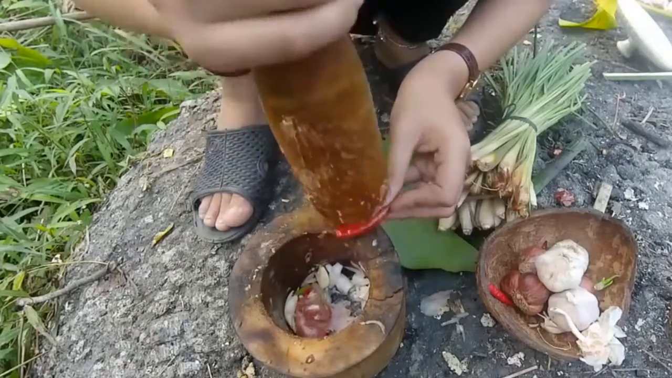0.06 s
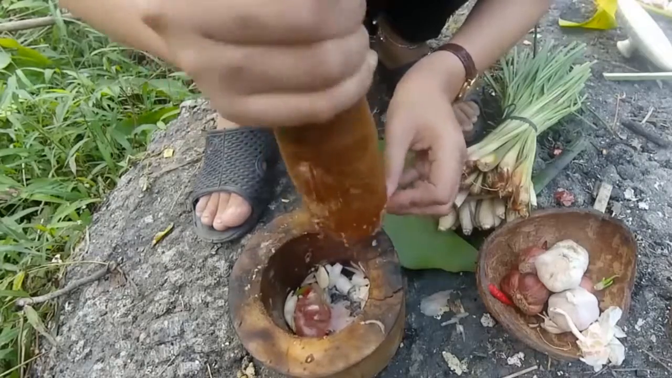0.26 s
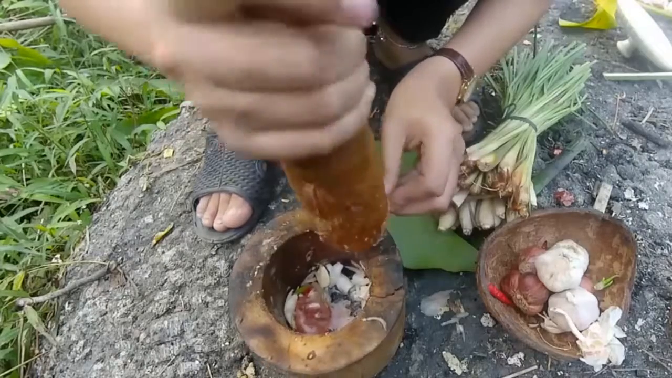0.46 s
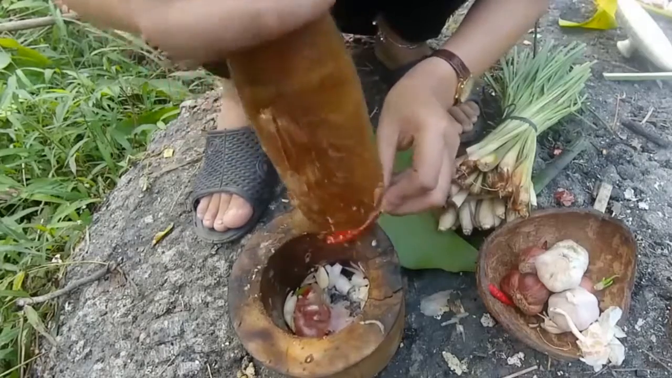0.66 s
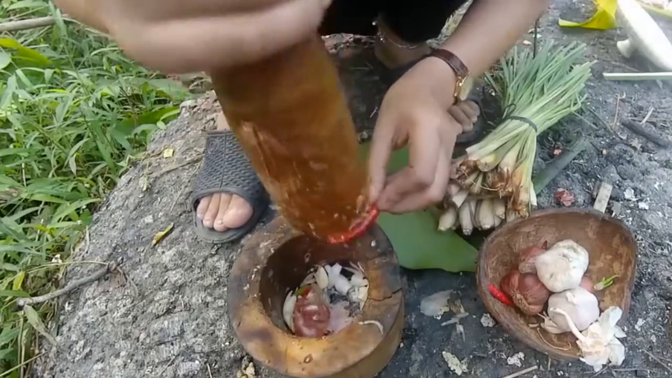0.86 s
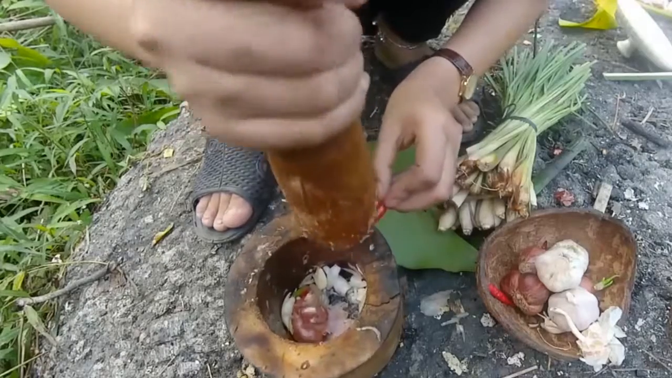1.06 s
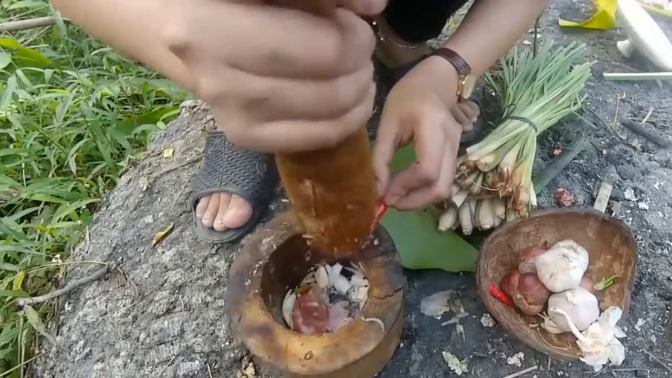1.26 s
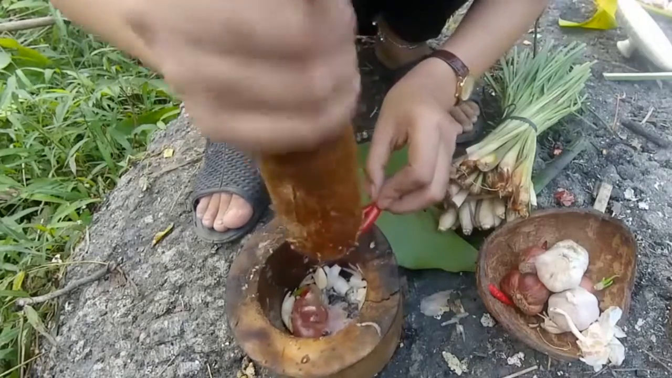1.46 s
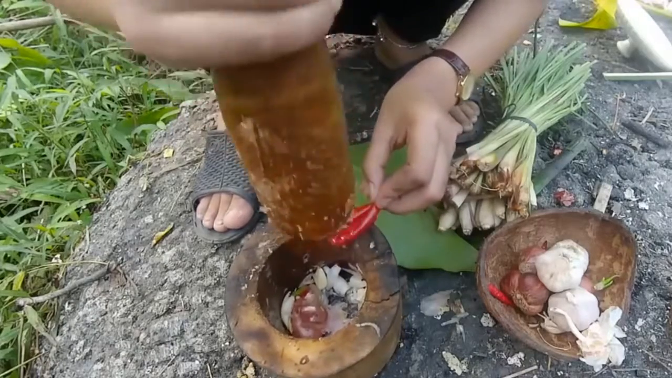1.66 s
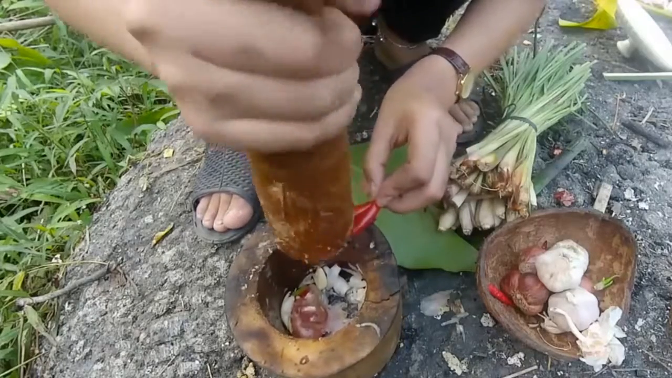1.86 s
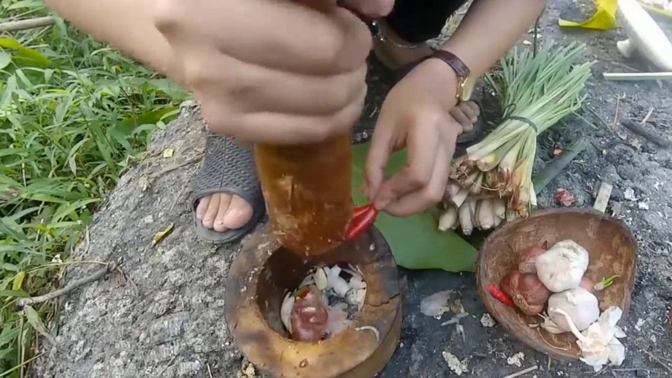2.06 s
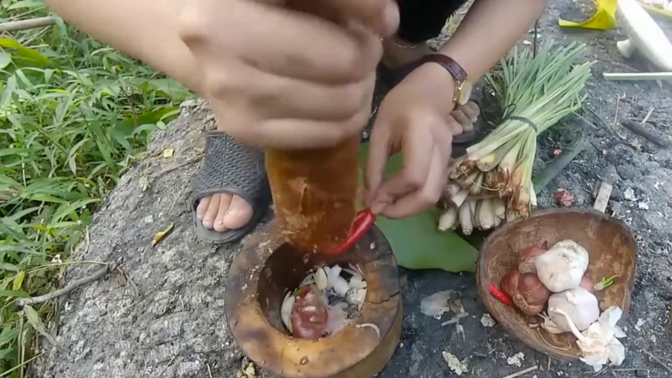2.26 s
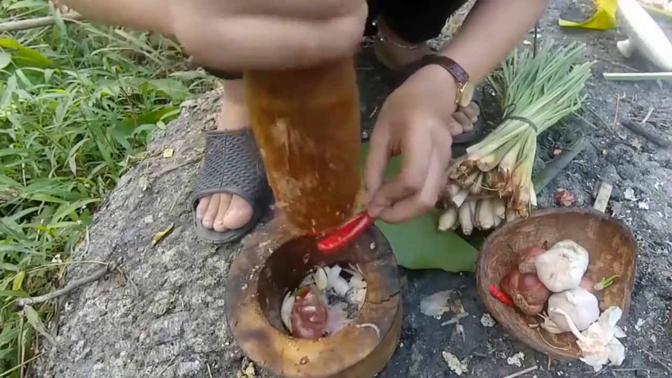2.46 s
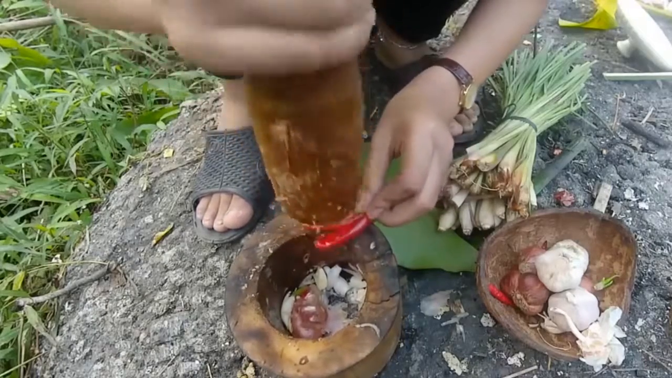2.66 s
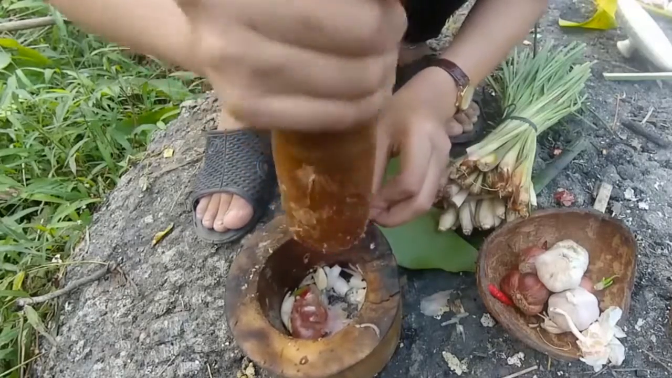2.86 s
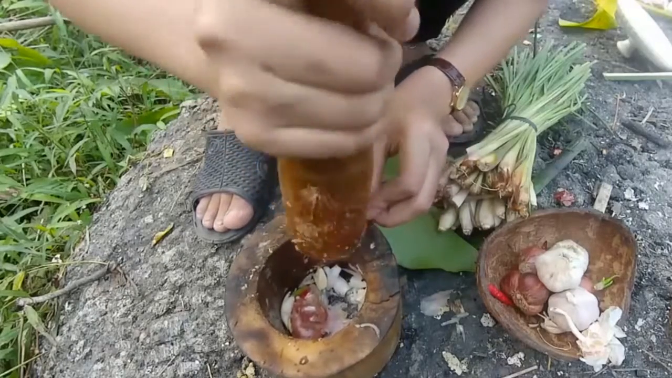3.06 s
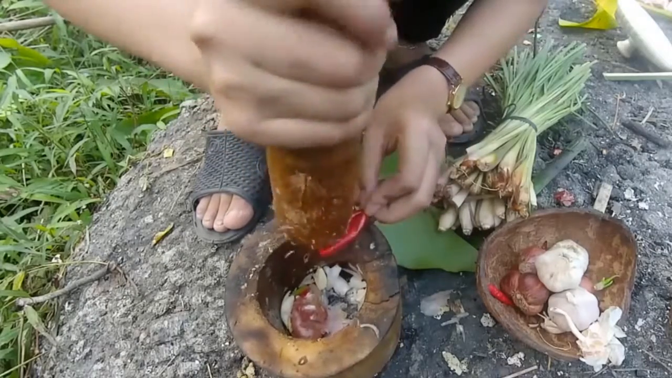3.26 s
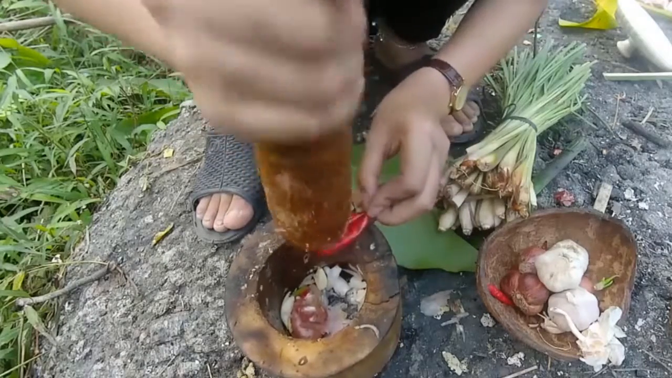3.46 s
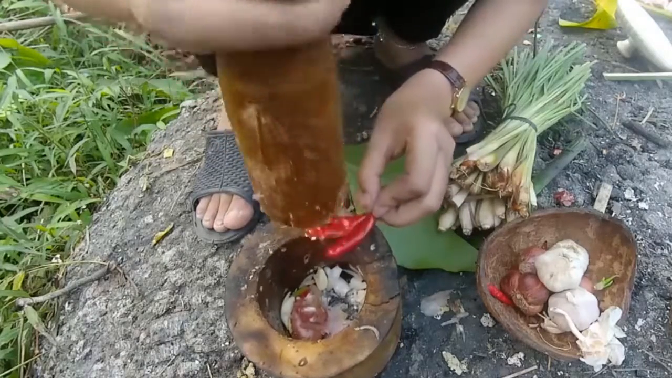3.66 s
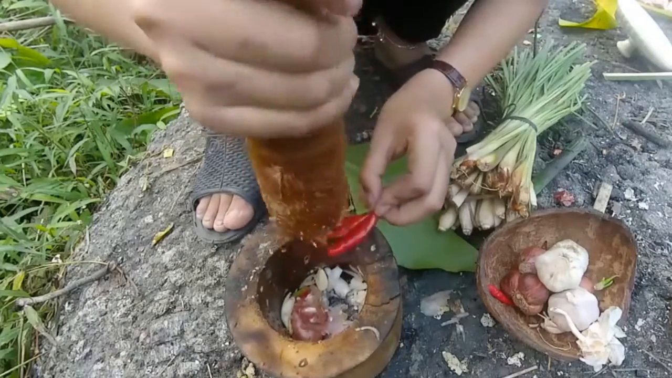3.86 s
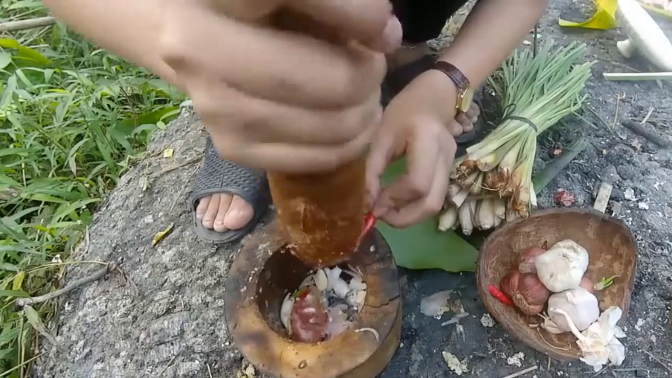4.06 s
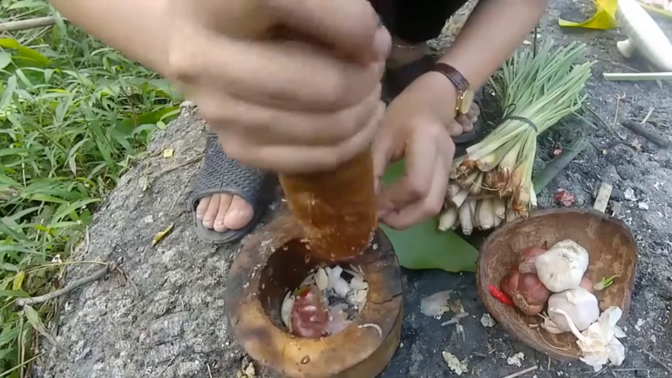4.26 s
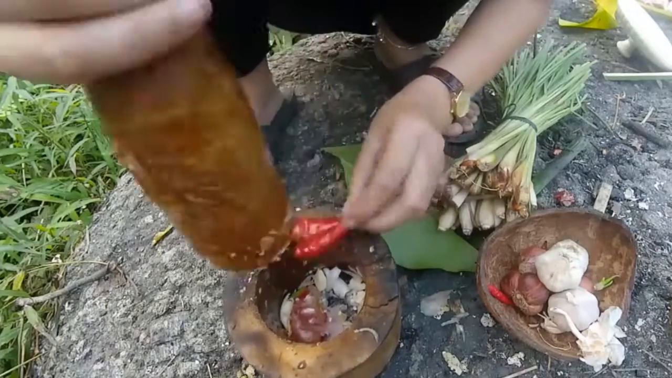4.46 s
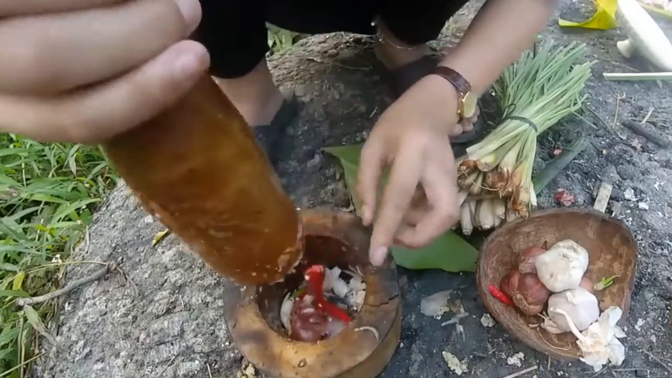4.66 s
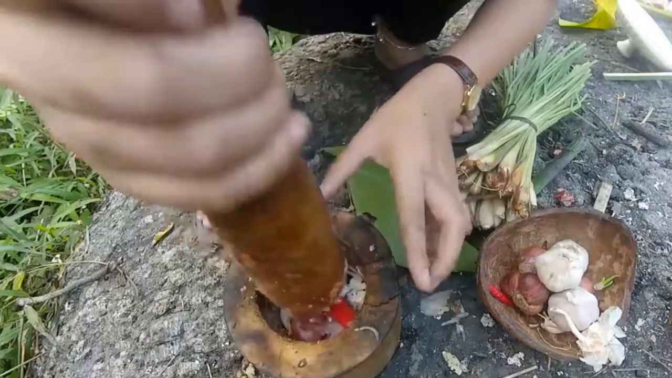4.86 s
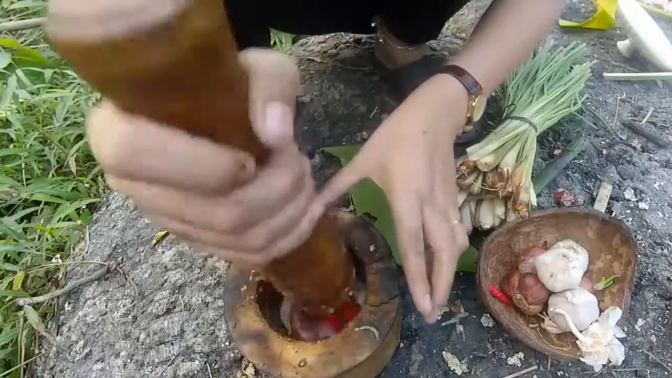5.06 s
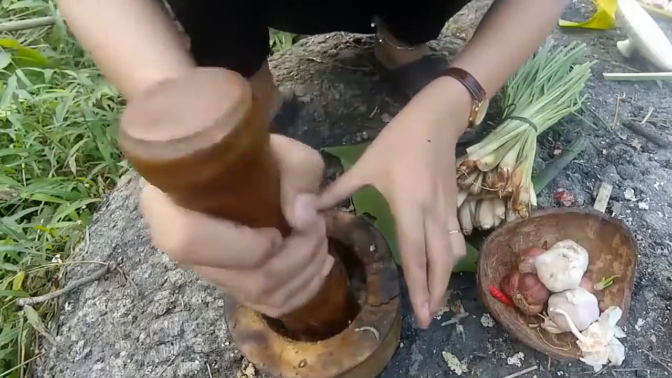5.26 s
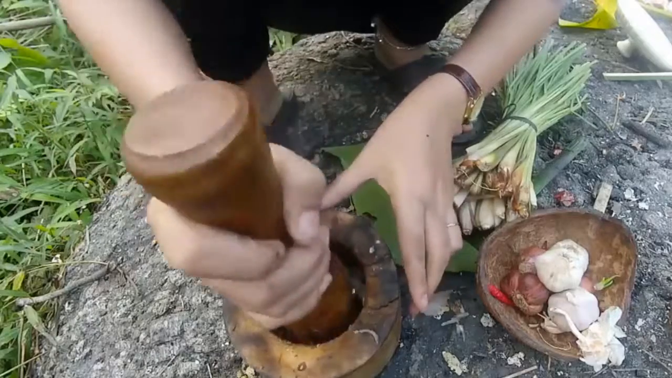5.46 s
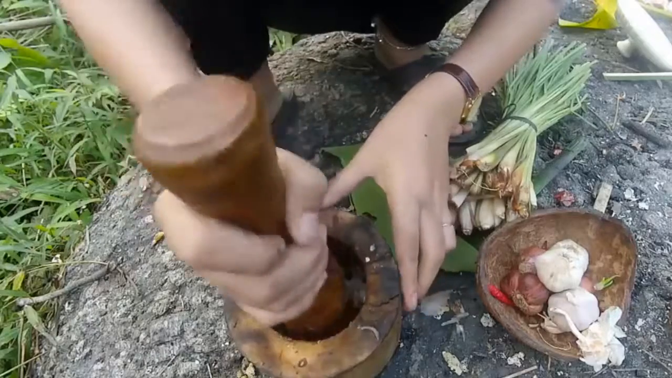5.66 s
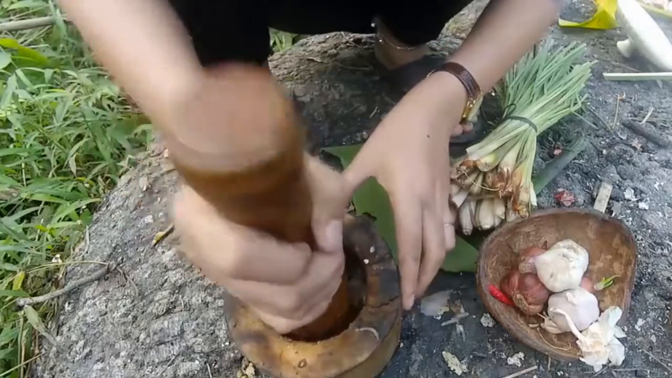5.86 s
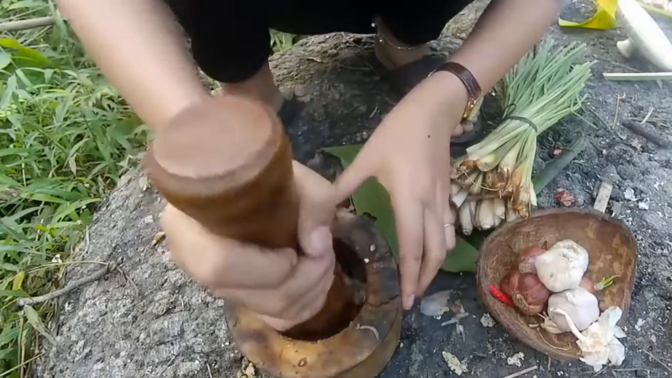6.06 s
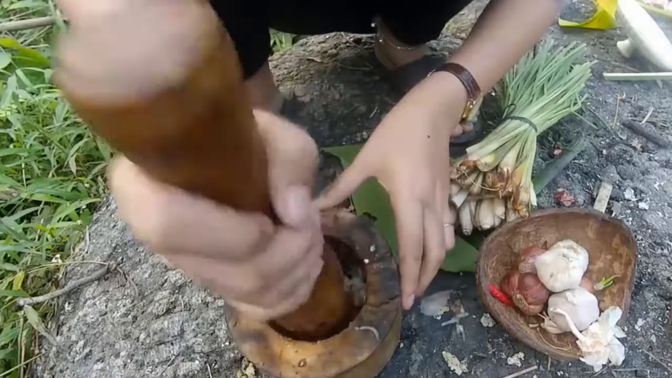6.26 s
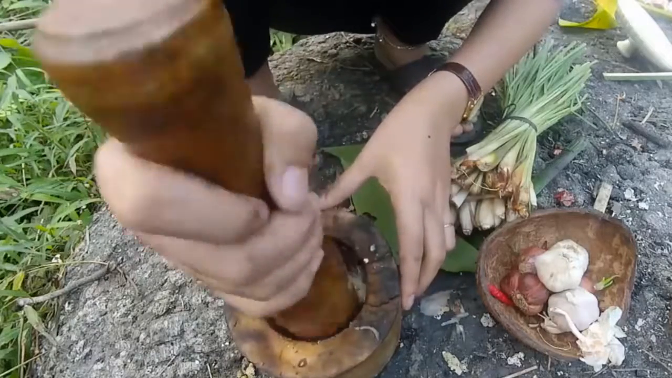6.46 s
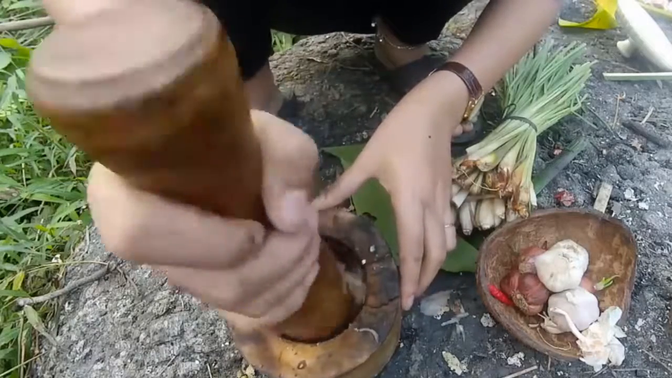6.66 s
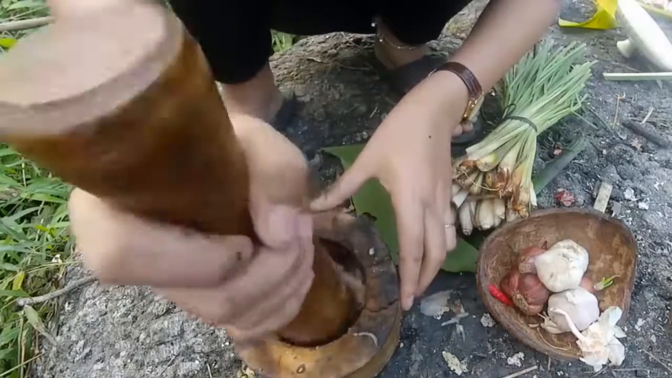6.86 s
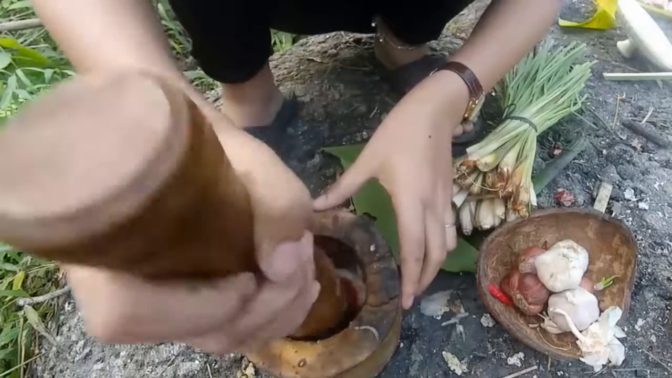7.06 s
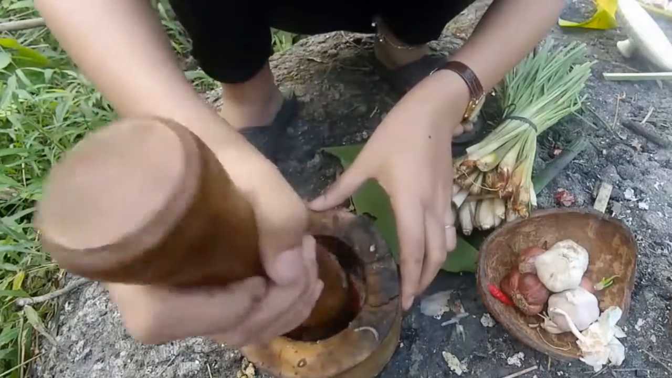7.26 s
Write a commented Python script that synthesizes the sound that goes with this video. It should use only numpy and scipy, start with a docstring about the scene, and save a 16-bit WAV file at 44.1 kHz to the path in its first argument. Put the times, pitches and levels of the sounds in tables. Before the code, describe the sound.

Outdoors and very close to the microphone, a heavy wooden pestle strikes food in a hollow wooden mortar about four times a second. Blows begin duller and softer, grow loud and woody, then briefly stop. Pounding returns harder, with crisp wet crunches, rim knocks and quick double taps. The loudest hits slightly overload. A faint low rumble, insect bands and airy hiss stay steady behind.

```python
"""On stony ground outdoors, a wooden pestle pounds wet food in a hollow wooden mortar, close to a microphone.
Each blow pushes air out, rings the hollow and the wood as decaying modes, booms in the ground,
rattles on grit and crushes the food with a short squelch of crackling noise; rim knocks and rebounds join in.
Behind lie a low rumble, insect-like bands and a hiss, made from random short-time spectra.
The hardest blows overload the input."""
import sys
import numpy as np
from scipy import signal
from scipy.fft import rfft, irfft
from scipy.io import wavfile
from scipy.ndimage import uniform_filter1d

SR = 44100
rng = np.random.default_rng(int(sys.argv[2]) if len(sys.argv) > 2 else 0)


def transcribe(u):
    """Save the signal u as a 16-bit wav file named by the first command-line argument.

    u: samples, shape (n,) or (channels, n), limited to [-1, 1]; the rate is SR.
    q: integer samples, one column per channel.
    """
    v = np.clip(np.atleast_2d(u).T, -1, 1)
    q = np.round(v * 32767).astype(np.int16)
    wavfile.write(sys.argv[1], SR, q)


N = 322371


def gain_of(db):
    """Decibels to amplitude."""
    return 10 ** (np.asarray(db) / 20)


def evened(x):
    """Scales to rms 1."""
    return x / np.sqrt(np.mean(x ** 2) + 1e-20)


def read(points, hz):
    """Reads a spectrum table in dB on a log-frequency axis."""
    f, db = np.transpose(sorted(points))
    return np.interp(np.log(hz + 1), np.log(f + 1), db)


def coloured(noise, db):
    """Noise filtered by a spectrum in dB, then set to rms 1."""
    return evened(irfft(rfft(noise) * gain_of(db), len(noise)))


def add(mix, s, sound):
    """Mixes a sound in at a time in seconds."""
    part = mix[round(s * SR):][:len(sound)]
    part += sound[:len(part)]


def background(spectrum, db, patchy_db, swell_db):
    """Steady noise from random short-time spectra, with drifting patches and a slow shared swell."""
    size = 1024
    air_hz = 15820  # the background falls away above this
    spectrum = list(spectrum) + [(air_hz, spectrum[-1][1]), (air_hz + 40, -120)]
    frames = 4 * N // size + 5
    hz = np.fft.rfftfreq(size, 1 / SR)
    real, imaginary, patches = rng.standard_normal((frames, len(hz), 3)).T
    swell = evened(uniform_filter1d(patches[0], size=24))
    patches = uniform_filter1d(patches, size=8, axis=0)  # across frequency
    patches = evened(uniform_filter1d(patches, size=12, axis=1))  # across time
    level_db = read(spectrum, hz)[:, None] + patchy_db * patches + swell_db * swell
    spectra = (real + 1j * imaginary) * gain_of(level_db)
    noise = signal.istft(spectra, nperseg=size, noverlap=size - size // 4)[1][:N]
    return gain_of(db) * evened(noise)


# Low outdoor rumble. Each row: frequency in Hz, relative level in dB per Hz.
RUMBLE_SPECTRUM = [(8.8, -30), (15, 9), (33, -2.5), (103, -6), (134, -13.5), (248, -10), (351, -21.5),
                   (389, -15.5), (440, -23), (477, -19.5), (676, -21.5), (829, -23), (2000, -32.5),
                   (2600, -46), (4400, -120)]


def rumble():
    """Low outdoor noise with a gentle swell."""
    return background(RUMBLE_SPECTRUM, -42.5, patchy_db=1.8, swell_db=1.2)


# Insect-like bands. Each row: frequency in Hz, relative level in dB per Hz.
INSECT_SPECTRUM = [(1120, -68), (1900, -3.5), (2140, -11.5), (2300, 7.5), (2720, -1), (3140, -8),
                   (3310, -7.5), (3470, -7), (3880, 1), (4240, -3.5), (4760, -1.5), (5320, -2.5),
                   (6130, 3.5), (7090, 3), (7700, -4.5), (10000, -36), (16900, -120)]


def insects():
    """Insect-like noise gathered in bands, mostly between 2 and 8 kHz."""
    return background(INSECT_SPECTRUM, -48, patchy_db=1.5, swell_db=.5)


# Banded high hiss. Each row: frequency in Hz, relative level in dB per Hz.
HISS_SPECTRUM = [(4530, -44), (7700, -11), (8310, 1), (8690, 1), (9030, -4), (9390, 0.5), (9780, 0),
                 (10700, -3.5), (11400, -5), (13300, 1.5), (13800, -10), (14400, 4.5), (15600, -6)]


def hiss():
    """Banded treble noise in flickering patches."""
    return background(HISS_SPECTRUM, -53.5, patchy_db=2.5, swell_db=-0.9)


def swing(t, hz, t60, rise):
    """Pressure builds up to the contact at t = 0, then swings back and dies away, with a rounded crest."""
    after = np.maximum(t, 0)
    build_up = np.exp(np.minimum(t, 0) / rise)
    sharp = build_up * np.cos(2 * np.pi * hz * after) * gain_of(-60 * after / t60)
    return uniform_filter1d(uniform_filter1d(sharp, size=13), size=13)


def ring(t, hz, t60, rise, turn, sag=0, sag_s=0.0009):
    """A mode that swells in and dies away; its pitch starts low by the share sag, its phase by turn cycles."""
    lead = .5 / hz  # starts half a cycle ahead of t = 0
    since = np.maximum(t + lead, 0)
    bend = sag * sag_s * (np.exp(-since / sag_s) - np.exp(-lead / sag_s))
    cycles = hz * (t + bend) + turn
    swell_in = 1 - np.exp(-(since / rise) ** 2)
    return swell_in * np.cos(2 * np.pi * cycles) * gain_of(-60 * since / t60)


CONTACT_S = 0.00046  # wood meets wood


def hollow_ring(t, db, hz, t60, hold_s, step_db):
    """The bowl opens and its pitch rises; the ring holds a few ms, then its level steps down or up."""
    stepped = 1 / (1 + np.exp(np.clip((hold_s - t) / 0.00011, -50, 50)))
    return gain_of(db + step_db * stepped) * ring(t, hz, t60, CONTACT_S, turn=0, sag=0.34)


def air_thud(t, db, sucked_back):
    """Air is pushed out of the bowl, then a share of it is sucked back."""
    push = swing(t, 297, 0.0071, rise=0.0011)
    suck = swing(t - .0012, 173, 0.0039, rise=0.0017)
    return gain_of(db) * (push - sucked_back * suck)


def foot_ring(t, db, turn):
    """The thick foot of the mortar rings low, just after contact."""
    return gain_of(db) * ring(t - .002, 433.5, 0.031, 0.0011, turn)


def ground_boom(t, thud_db, offset_db):
    """The ground answers with one deep swing, its level following the thud by about half."""
    boom_db = -28.5 + .55 * thud_db + offset_db
    return -gain_of(boom_db) * swing(t - .004, 29, 0.05, rise=0.0069)


# Modes of the wood. Each row: frequency in Hz, relative level in dB, t60 in seconds.
WOOD_MODES = [(1010, -13.5, 0.044), (1244, -2, 0.018), (1365, -19, 0.016), (1715, -28, 0.02),
              (718, -11, 0.024), (959.5, -5, 0.034), (1975, -31.5, 0.035)]


def wood_ring(t, wood_db, chance):
    """Each blow lands elsewhere, so it wakes the wood's modes unevenly in level and phase."""
    total = np.zeros(len(t))
    for (hz, db, t60), c in zip(WOOD_MODES, chance):
        uneven_db = 3.5 * c
        total += gain_of(wood_db + db + uneven_db) * ring(t, hz, t60, 4.7 * CONTACT_S, 0.29 * c)
    return total


# Mortar rocking on grit. Each row: frequency in Hz, relative level in dB per Hz.
RATTLE_SPECTRUM = [(200, -24), (400, 1), (700, -3), (950, -5), (1300, -4.5), (1700, -28), (3000, -31)]


def grit_rattle(t, db, noise):
    """The mortar rocks on grit: coarse noise with a quick onset and a 50 ms t60."""
    after = np.maximum(t, 0)
    hz = np.fft.rfftfreq(len(noise), 1 / SR)
    onset = 1 - np.exp(-after / 0.00045)
    return coloured(noise[::-1], read(RATTLE_SPECTRUM, hz)) * gain_of(db - 60 * after / 0.05) * onset


# Crushed wet food. Each row: frequency in Hz, relative level in dB per Hz before brightness and unevenness.
CRUSH_SPECTRUM = [(880, 2.5), (1500, -16), (1930, -12), (2840, -10), (4830, 0), (5500, 0.5), (6270, 2),
                  (7500, 2.5), (13700, 6), (15100, 5), (16400, -9)]


def food_crush(t, db, tilt_db, crush_s, noise, chance):
    """Food crackles as it gives way around the contact, then oozes on; every crunch has its own colour."""
    hz = np.fft.rfftfreq(len(noise), 1 / SR)
    uneven_db = 4 * np.interp(hz, np.linspace(0, SR / 2, len(chance)), chance)
    brightness_db = tilt_db * np.log2(np.maximum(hz, 1800) / 7000)
    cuts_db = -40 * (hz < 900) - 9 * (hz > 15700)
    crackle = coloured(noise, read(CRUSH_SPECTRUM, hz) + brightness_db + uneven_db + cuts_db)
    peak_s = .0005
    width_s = crush_s * np.where(t < peak_s, 1.2, .9)
    squeeze = np.exp(-(abs(t - peak_s) / width_s) ** 2.14)
    ooze_db = -39 + 0.2 * db
    ooze = gain_of(ooze_db - 60 * np.maximum(t, 0) / 0.18) * (t > 0)
    return crackle * (gain_of(db) * squeeze + ooze)


# Main blows, and a few knocks on the rim with hardly any thud. Each row: contact in seconds,
# hollow ring level in dB, its pitch in Hz as the pestle fills the bowl, its t60 in seconds,
# its hold in seconds, then its level step in dB, thud in dB, foot ring in dB,
# wood in dB, rattle in dB, crush in dB, crush brightness in dB per octave.
BLOW_ROWS = [(0.035, -16.5, 640, 0.043, 0.0021, -28, -33, -16, -21, -35, -44, -11),
             (0.303, -16, 844, .043, 0.0024, -4, -14.5, -39, -46, -31.5, -41, -10),
             (0.586, -10.5, 898, .064, 0.0051, -5, -11, -28, -34, -29, -34, -9.5),
             (0.854, -9, 896, 0.071, 0.0087, -6.5, -8, -32, -15.5, -38, -30.5, -12),
             (1.119, -6, 872, 0.033, 0.0027, 2.5, -6, -24, -11.5, -20, -29, -12),
             (1.373, -0.5, 872, 0.056, 0.0077, -6, -9, -27, -22, -13, -27.5, -5),
             (1.627, 2.5, 893, 0.048, .006, -5.5, -6.5, -21.5, -3.5, -21, -22, -10),
             (1.893, -14.5, 900, 0.076, 0.0075, -10.5, -11, -36, -21, -30, -18, -4.5),
             (2.148, -10.5, 854, 0.043, 0.0043, -7, -8.5, -19, -9.5, -38, -25.5, -3.5),
             (2.393, -23, 840, 0.091, 0.0033, -10, -12, -23, -46, -32, -25.5, -7),
             (2.639, -23, 884, .063, 0.0058, -4, -12, -24, -18, -29.5, -29, -4),
             (2.89, -14, 890, 0.04, .004, -7, -10.5, -50, -54, -34, -29.5, -5),
             (3.146, -2, 890, 0.074, 0.0064, -12.5, -9, -27, -4.5, -18.5, -30.5, -6.5),
             (3.384, 3, 893, 0.076, .0042, -12.5, -10.5, -40, 2, -14.5, -10.5, -5),
             (3.629, -5, 856, 0.054, 0.0052, -7, -8.5, -37, -41, -32, -13, 1.5),
             (3.873, 1, 875, 0.05, 0.0045, -6, -9, -36, -31, -16.5, -18.5, -6),
             (4.163, -21, 877, 0.028, 0.0036, 8, -13.5, -25, -39, -35, -16, -6),
             (4.405, -18.5, 880, 0.051, 0.0072, -4, -15, -21, -53, -43, -26.5, 0.5),
             (5.084, -2.5, 990, 0.079, .0125, -17, -10.5, -18, -11, -38, -19.5, -6.5),
             (5.33, -5.5, 780, .021, 0.0021, -26, -10.5, -24, -11.5, -33, -15.5, -9),
             (5.565, -1.5, 830, 0.015, .0026, -10, -8.5, -14, -31, -28, -10, -5),
             (5.79, -2, 750, 0.043, 0.0018, -13, -10, -19, -39, -20.5, -16.5, -3),
             (5.951, -7.5, 892, 0.04, 0.0056, -8, -56, -41, -12.5, -25, -16.5, -21.5),
             (6.007, -2.5, 837, 0.019, 0.0032, 3, -12.5, -9, -5, -12, -4.5, -8),
             (6.215, -21.5, 920, 0.042, 0.0047, 1, -10, -14, -30, -27.5, -18, -8),
             (6.439, -0.5, 923, 0.033, 0.0029, -26, -6, -22, -5.5, -17.5, -15, -6),
             (6.648, 5.5, 934, 0.018, 0.0033, -16, -9.5, -13.5, 1.5, -26, -16.5, -7),
             (6.798, -6.5, 910, 0.021, .0045, -13, -43, -44, -10.5, -27.5, -28.5, -18.5),
             (6.85, -2, 819, 0.05, 0.0016, -3, -9, -7, -31, -13.5, -20, -5.5),
             (7.007, -8.5, 890, 0.05, 0.0018, -8, -48, -23, -12, -33, -31.5, -11),
             (7.067, -4, 750, 0.052, 0.0011, -11, -11, -25, -30, -26, -15.5, -7.5),
             (7.223, -12, 820, 0.05, 0.004, -2.5, -46, -33, -50, -44, -31, -12.5),
             (7.287, -14, 1070, .055, 0.0029, -16, -8.5, -13, -26, -18.5, -16.5, -8)]
# Air sucked back, ground boom and crush length, varying unevenly from time to time. Each row: time in seconds,
# share of the air sucked back from 0 to 1, ground boom offset in dB, crush length scale in seconds.
UNEVEN_POUNDING = [(0, 0, 9, 0.0082), (1.2, 0.06, 5, 0.0026), (1.7, 0, -15, 0.0022), (2.6, 0, 14, 0.0023),
                   (3.1, 0, 10, 0.0035), (3.502, 0.34, 3, 0.0016), (3.9, 0.4, 7, 0.0022),
                   (4.2, 0, 7.5, 0.0026), (5.1, 0.75, -3, 0.004), (5.5, 0.9, -6, 0.0026),
                   (6.1, 0.5, 0, 0.0021), (6.496, .45, -20, 0.0029), (7.3, 0.54, -14, 0.003)]


def blow(row, noise, chance):
    """One contact of the pestle: air, hollow, wood, ground, grit and food sound together."""
    (s, ring_db, ring_hz, ring_t60, hold_s, step_db,
     thud_db, foot_db, wood_db, rattle_db, crush_db, tilt_db) = row
    times, *settings = np.transpose(UNEVEN_POUNDING)
    sucked_back, ground_db, crush_s = (np.interp(s, times, setting) for setting in settings)
    lead = .012  # seconds of build-up before contact
    t = np.arange(len(noise)) / SR - lead
    sound = hollow_ring(t, ring_db, ring_hz, ring_t60, hold_s, step_db)
    sound += air_thud(t, thud_db, sucked_back)
    sound += foot_ring(t, foot_db, turn=chance[-1])
    sound += ground_boom(t, thud_db, ground_db)
    sound += wood_ring(t, wood_db, chance)
    sound += grit_rattle(t, rattle_db, noise)
    sound += food_crush(t, crush_db, tilt_db, crush_s, noise, chance)
    return s - lead, sound


# Lighter rebounds and grazes around the blows. Each row: contact in seconds, hollow ring level in dB,
# its pitch in Hz, thud in dB, crush in dB.
REBOUND_ROWS = [(0.053, -22, 1020, -29, -52), (0.09, -33, 920, -24, -59), (0.316, -22.5, 920, -21, -57),
                (0.348, -34, 680, -28, -53), (0.631, -25.5, 790, -23, -60), (0.869, -21, 970, -31, -52),
                (0.905, -29.5, 865, -19, -61), (1.133, -19, 996, -32, -54), (1.185, -17, 847, -19.5, -64),
                (1.422, -28.5, 860, -22, -48), (1.645, -28, 890, -32, -28.5), (1.671, -31, 880, -25, -57),
                (1.951, -35.5, 900, -29, -65), (2.17, -24, 830, -22, -33.5), (2.955, -42, 900, -30, -59),
                (3.39, -29, 870, -40, -17), (3.405, -15.5, 930, -22, -46), (3.65, -17.5, 837, -27, -31),
                (3.891, -39, 896, -21, -38), (4.187, -47, 915, -46, -48), (4.203, -40, 875, -26, -54),
                (4.448, -26, 850, -19, -54), (5.287, -30.5, 830, -43, -40), (5.495, -26, 810, -36, -46),
                (5.52, -22, 900, -48, -49), (5.577, -13, 1034, -27, -36), (5.793, -9, 938, -54, -38),
                (5.755, -38, 900, -33, -45), (6.17, -28.5, 800, -26, -36.5), (6.221, -36, 1000, -48, -27),
                (6.61, -24, 886, -35, -44), (6.805, -29, 840, -42, -52), (6.856, -6, 1048, -49, -48),
                (7.012, -21, 850, -43, -42), (7.073, -15, 1000, -20, -48), (7.251, -23, 840, -52, -47),
                (7.301, -13.5, 964, -46, -50)]


def rebound(s, ring_db, ring_hz, thud_db, crush_db):
    """A rebound as a row of a blow: all share one ring decay, and harder ones crush brighter."""
    t60, hold_s, step_db = 0.041, 0.0046, -2
    foot_db, wood_db, rattle_db = ring_db - 9, ring_db - 11.5, ring_db - 20
    tilt_db = 5 + 0.41 * crush_db  # dB per octave
    return (s, ring_db, ring_hz, t60, hold_s, step_db,
            thud_db, foot_db, wood_db, rattle_db, crush_db, tilt_db)


def scene():
    """All blows, rim knocks and rebounds over rumble, insects and hiss."""
    mortar = np.zeros(N)
    hits = list(BLOW_ROWS) + [rebound(*row) for row in REBOUND_ROWS]
    shape = (len(hits), 4096)
    # random loudness from sample to sample makes the noise crackle
    grit = rng.standard_normal(shape) * gain_of(7.56 * rng.standard_normal(shape))
    chances = rng.standard_normal((len(hits), 24))
    for row, noise, chance in zip(hits, grit, chances):
        add(mortar, *blow(row, noise, chance))
    return (mortar + rumble() + insects() + hiss())[None]


def record(dry):
    """The input rounds off the highest peaks near full scale; a low-pass then limits the band."""
    knee, ceiling = 6, .94
    clipped = dry / (1 + abs(dry / ceiling) ** knee) ** (1 / knee)
    low_pass = signal.firwin(511, 16450, window=("kaiser", 9), fs=SR)  # edge in Hz
    return signal.oaconvolve(clipped, low_pass[None], "same")


dry = scene()
out = record(dry)
transcribe(out)
```